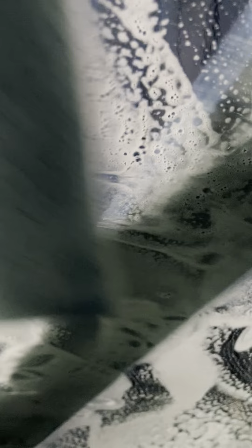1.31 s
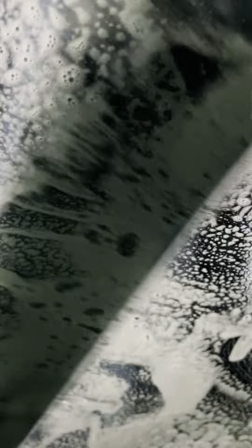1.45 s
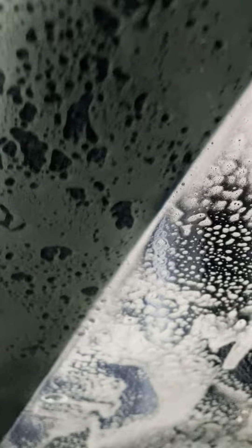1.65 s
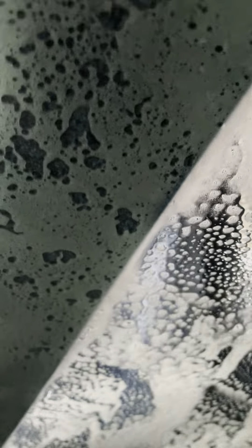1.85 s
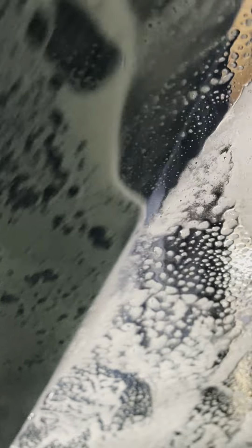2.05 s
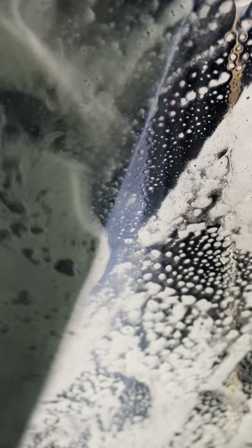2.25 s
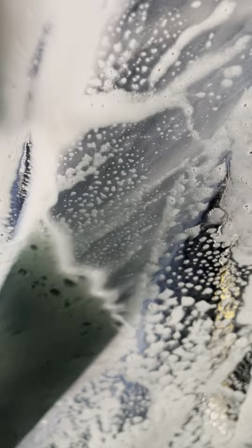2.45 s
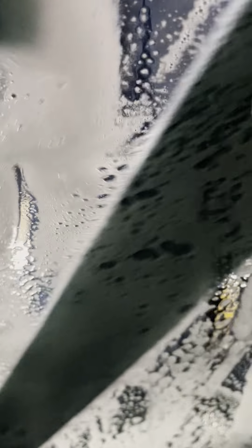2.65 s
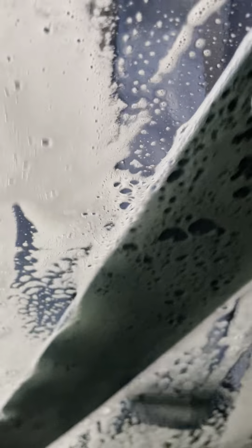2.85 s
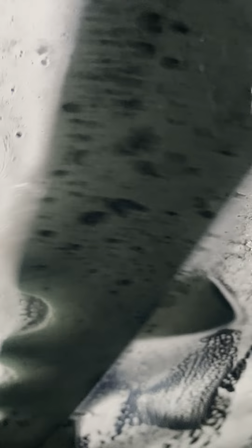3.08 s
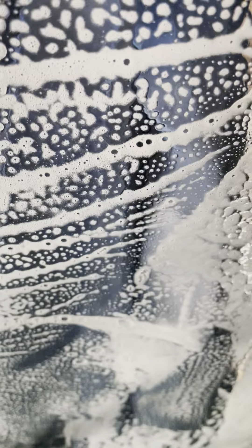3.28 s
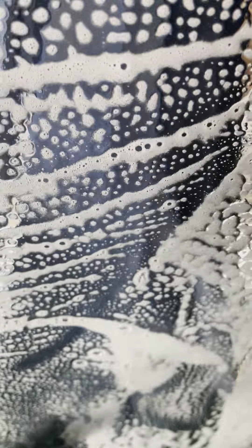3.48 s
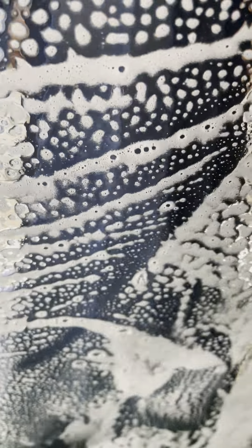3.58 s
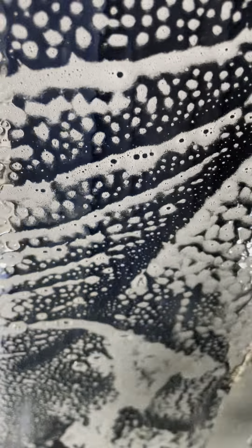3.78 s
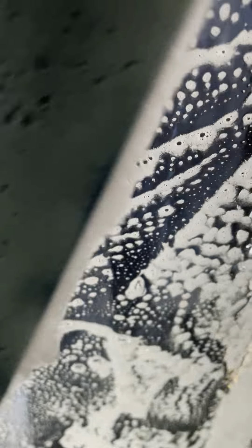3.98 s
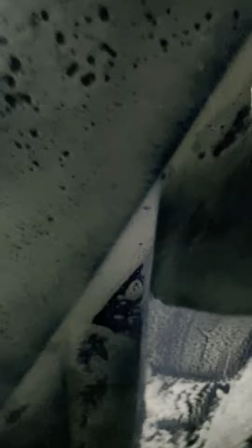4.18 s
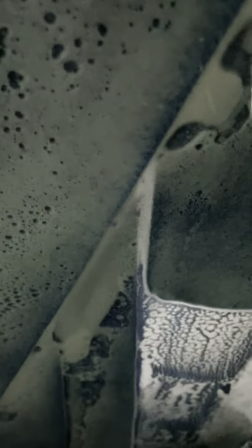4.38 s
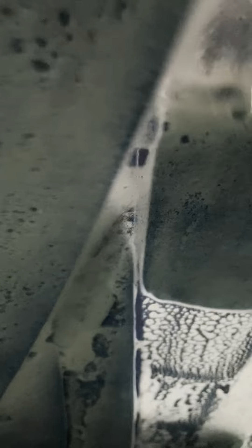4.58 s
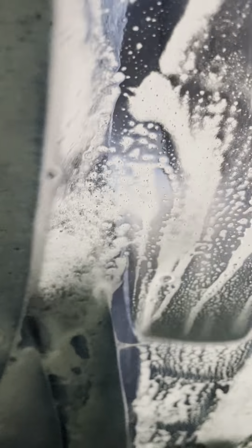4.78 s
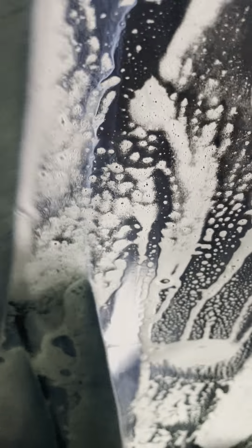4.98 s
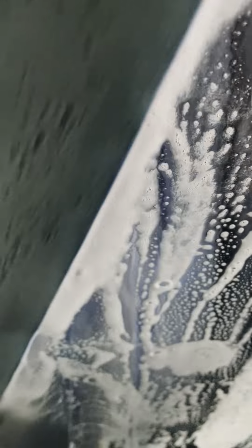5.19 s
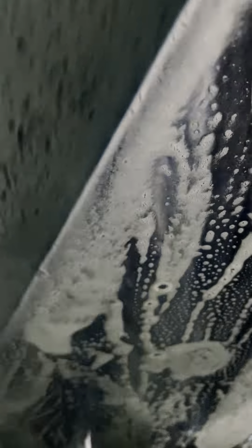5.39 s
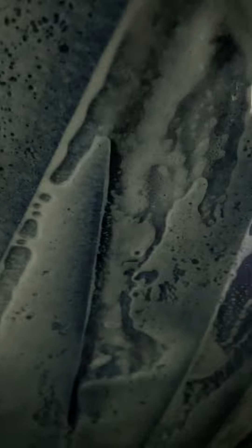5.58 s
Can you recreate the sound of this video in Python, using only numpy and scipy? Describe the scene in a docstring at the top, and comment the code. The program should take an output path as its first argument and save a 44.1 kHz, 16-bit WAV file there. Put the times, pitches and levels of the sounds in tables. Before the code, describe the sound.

Inside a car in a tunnel wash, a phone in the cabin picks up close, muffled stereo sound. From the start wet cloth drags over the body with a low, fluctuating rumble and faint dull pattering, while water spray hisses softly outside. A weak thump comes at 0.15 s, then a tight group of thuds and wet slaps at 0.5-0.6 s. Blows roll on from 1.0 to 1.5 s, and a dense splashy flurry hits the glass at 1.7-1.9 s. Single thumps follow at 2.35 and around 2.7 s, then a strong double cluster at 3.0-3.2 s. It eases to rubbing and light slaps until the hardest, deep booming blow near 4.2 s and a sharp slap at 4.4 s. After a sparser stretch with small hits near 5.0 and 5.2 s, a last cluster lands at 5.4-5.6 s. Panel booms die quickly; slaps leave short foamy, spattering tails.

```python
"""Inside a car in a tunnel wash, heard by a phone with two ports in the cabin.
From the start wet cloth drags over the body, rumbling and pattering (coloured noise, faint random taps),
and water spray hisses outside (brighter noise). From 0.15 s heavy blows thump the panels, which boom
(decaying sines); from 0.5 s wet strips slap the glass (noise bursts through resonances, a falling crack).
The hardest blow lands near 4.2 s; blows and slaps go on almost to the end at 5.6 s."""
import sys
import numpy as np
from scipy import signal
from scipy.fft import rfft, irfft
from scipy.io import wavfile
from scipy.ndimage import uniform_filter1d

SR = 44100
rng = np.random.default_rng(int(sys.argv[2]) if len(sys.argv) > 2 else 0)


def put_to_file(sound):
    """Save the sound as 16-bit audio at rate SR, in the file named by the first command-line argument."""
    columns = np.atleast_2d(sound).T  # one column per channel
    safe = np.clip(columns, -1, 1)
    whole_steps = np.round(safe * 32767)
    wavfile.write(sys.argv[1], SR, whole_steps.astype(np.int16))


N = 248283
HZ = np.maximum(np.fft.rfftfreq(N, 1 / SR), 1)  # frequency of each spectrum bin


def undb(db):
    """Decibels to amplitude."""
    return 10 ** (np.asarray(db) / 20)


def over_hz(table):
    """A (f/Hz, value) table on all frequencies, straight on a log axis."""
    hz, value = np.transpose(table)
    return np.interp(np.log(HZ), np.log(hz), value)


def over_time(table):
    """A (t/s, level/dB) table on all samples, in straight lines."""
    return np.interp(np.arange(N) / SR, *np.transpose(table))


def unit(x):
    """Scale to an RMS of 1."""
    return x / np.sqrt(np.mean(x ** 2))


def peak(x):
    """Scale to a peak of 1."""
    return x / np.abs(x).max()


def fade(t, t60):
    """Exponential decay that falls 60 dB in t60 seconds."""
    return np.exp(-np.log(1000) * t / t60)


def walk(rate):
    """Random levels held 1 / rate s and smoothed twice; spread near 1."""
    k = int(SR / rate)
    held = np.repeat(rng.standard_normal(N // k + 1), k)
    return 1.9 * uniform_filter1d(uniform_filter1d(held, k), k)[:N]


def flickering(colour, shared_db, own_db, rate):
    """Noise of a given colour in bands 2/3 octave apart that swell together and flicker alone."""
    white = rfft(rng.standard_normal(N)) * undb(over_hz(colour))
    out = 0
    for octave in np.arange(4, 14.6, 2 / 3):  # band centre, log2 of Hz
        window = np.cos(np.clip((np.log2(HZ) - octave) * 1.5, -1, 1) * np.pi / 2) ** 2
        out = out + irfft(white * window, N) * undb(shared_db + own_db * walk(rate))
    return unit(out)


def resonate(x, hz, width):
    """Two-pole resonance, gain 1 at the centre; width in Hz."""
    return signal.lfilter(*signal.iirpeak(hz, hz / width, SR), x)


def add(track, s, x):
    """Lay a sound into the track from s seconds on."""
    i = max(int(s * SR), 0)
    track[i:i + len(x)] += x[:N - i]


def drag_level():
    """How strongly the cloth drags along the car, in dB."""
    # course of the cloth drag: (t/s, level/dB)
    drag_course = [(0.0, -29.5), (0.64, -28), (0.92, -32), (1.22, -23.5), (1.54, -30.5), (1.93, -24.5),
                   (2.05, -31.5), (2.29, -32.5), (2.52, -28.5), (3.25, -29), (3.36, -30.5), (3.54, -29.5),
                   (4.36, -26), (4.56, -25), (4.77, -33), (5.03, -32.5), (5.14, -26.5), (5.63, -29)]
    return over_time(drag_course)


def cloth_drag(swell_db):
    """Cloth rubbing along the body: low coloured noise whose bands swell and flicker."""
    # colour of the dragging cloth: (f/Hz, relative level/dB per Hz)
    drag_colour = [(15, -45), (25, -4.5), (65, 2), (141, -2.5), (175, -4), (219, -15), (345, -10.5),
                   (454, -23), (600, -23.5), (1000, -43), (2000, -44), (4000, -77.5)]
    return undb(drag_level()) * flickering(drag_colour, swell_db, 2.8, 22.006)


def water_spray(swell_db):
    """Spray outside the cabin: hissing coloured noise with a slight flicker."""
    # colour of the spray: (f/Hz, relative level/dB per Hz)
    spray_colour = [(700, 7.5), (1100, 1.5), (1800, -3), (2400, 1), (3500, 1.5), (4300, -4), (5500, -8),
                    (8000, -23.5), (11000, -23.5), (13000, -35), (16000, -25.5)]
    # course of the spray: (t/s, level/dB)
    spray_course = [(0, -42.5), (.4, -44.5), (1., -42.5), (1.75, -47), (2.45, -42), (2.8, -45), (3.3, -44),
                    (4.15, -44.5), (5., -46.5), (5.63, -49.5)]
    return undb(over_time(spray_course)) * flickering(spray_colour, swell_db, 0.91, 19)


def patter(times, sizes):
    """Faint, dull taps of cloth fringes at random, swelling with the drag."""
    out = np.zeros(N)
    for s, (size, place) in zip(times, sizes):
        tap_db = 9 * size - 25
        pane_hz = 260 * 2 ** (0.65 * place)
        add(out, s, slap(tap_db, -13.0, pane_hz, 2400, -7.0))
    return undb(drag_level() + 10) * out


def thumps():
    """Each blow is a soft push that booms the panel it lands on and rings the body modes near its pitch."""
    # heavy blows on the panels: (t/s, peak level/dB before the bass cut, panel region f/Hz)
    blows = [(0.145, -27.5, 122), (0.534, -13.5, 94), (0.562, -12.5, 106.7), (0.615, -16.5, 129),
             (0.993, -22, 140), (1.009, -12, 144), (1.103, -16, 164), (1.157, -15.5, 125),
             (1.243, -17, 115.5), (1.32, -14.5, 130.5), (1.352, -16.5, 59.4), (1.442, -15, 119.6),
             (1.733, -12, 64.8), (1.807, -17, 80), (1.82, -13, 98.4), (1.824, -16.5, 298),
             (1.841, -16.5, 82.4), (1.864, -15.5, 171.4), (1.906, -21.5, 147), (2.258, -19.5, 150),
             (2.349, -9, 128), (2.51, -14.5, 109.4), (2.644, -19, 183), (2.695, -12, 125.6),
             (2.729, -12, 110), (2.748, -11, 119.4), (2.886, -19, 96), (3.072, -11, 149),
             (3.085, -13.5, 90.5), (3.172, -7.5, 207), (3.188, -7.5, 81.6), (3.204, -13, 206),
             (3.291, -16.5, 68), (3.696, -21.5, 85), (3.743, -18.5, 84.6), (4.011, -18, 97.6),
             (4.101, -20, 79.5), (4.158, -17.5, 123), (4.193, -4.5, 108.5), (4.222, -18, 85.6),
             (4.326, -18, 152), (4.412, -11, 248), (4.416, -9, 79), (4.621, -20.5, 78), (4.69, -19.5, 76.2),
             (5.024, -17, 74), (5.455, -16.5, 155), (5.478, -17, 318), (5.483, -9, 84.4), (5.51, -13, 84.3),
             (5.573, -17.5, 77)]
    # ringing modes of the body: (nominal f/Hz, t60/s, level/dB when struck at its own pitch)
    body_modes = [(51.3, 0.43, -4), (59.4, 0.16, -8.5), (86.7, 0.27, 0), (125.9, 0.13, 0), (154.4, 0.13, 1),
                  (186.4, 0.14, -6.5), (257, 0.06, 4.5), (324, 0.097, -3.5), (460, 0.055, -38)]
    panel_db, panel_cycles = 2, 11.4  # the struck panel's own boom; cycles to fall 60 dB
    push_s = 0.0042  # time constant: a strip lands progressively
    out, t = np.zeros(N), np.arange(int(.4 * SR)) / SR
    chance = rng.uniform(-1, 1, (len(blows), len(body_modes)))
    for (s, db, place_hz), row in zip(blows, chance):
        ring = undb(panel_db) * np.sin(2 * np.pi * place_hz * t) * fade(t, panel_cycles / place_hz)
        for (hz, t60, mode_db), u in zip(body_modes, row):
            near_db = -12. * abs(np.log2(hz / place_hz))  # 12 dB less per octave away
            # each blow shifts the mode's level and pitch a little
            tone = np.sin(2 * np.pi * hz * (1 + 0.022 * u) * t)
            ring = ring + undb(mode_db + near_db + 5.1 * u) * tone * fade(t, t60)
        ring = ring * (1 - np.exp(-t / push_s)) ** 2
        add(out, s - .002, undb(db) * peak(ring))
    out = out * np.minimum(np.arange(N)[::-1] / 200, 1)  # eases out, no click at the end
    # panels radiate no deep bass
    return signal.sosfilt(signal.butter(2, 42, "high", fs=SR, output="sos"), out)


def slap(db, splash_db, hz, splash_hz, foam_db):
    """A falling crack, then the pane rings with a later, deeper knock; water splashes and spatters."""
    crack_db, knock_db = -10, -1.5  # against the pane
    spatter_db, drops_per_s = -4.5, 990  # flung drops; level against the splash
    rise_s, rise_ref_db, rise_db_per_doubling = 0.0015, -13.5, 11
    sweep_start, sweep_end, sweep_s = 1.662, 0.584, 0.00493  # multiples of the pane colour; s
    snap_s, wash_s, wash_db = .022, .09, -12  # t60, t60, wash against the snap
    t = np.arange(int(.2 * SR)) / SR
    noise = rng.standard_normal((4, len(t)))

    # fainter contacts brush in more slowly
    rise = 1 - np.exp(-t / (rise_s * 2 ** ((rise_ref_db - db) / rise_db_per_doubling)))
    foam = rise * undb(foam_db) * fade(t, 0.077)
    contact = rise * fade(t, 0.012)

    # bending waves in the glass: highs arrive first
    sweep_hz = hz * (sweep_end + (sweep_start - sweep_end) * np.exp(-t / sweep_s))
    sweep = np.sin(2 * np.pi * np.cumsum(sweep_hz) / SR)
    crack = rise * fade(t, 0.052) * sweep * np.sign(noise[0, 0])  # random polarity

    pane = resonate(resonate(noise[1] * (contact + foam), hz, 0.3 * hz), hz, 0.9 * hz)
    late_push = (1 - np.exp(-t / 0.0084)) * (fade(t, 0.061) + foam)
    knock = resonate(noise[1] * late_push, 0.45 * hz, 0.14 * hz)
    knock = resonate(knock, 0.774 * hz, 0.27 * hz)

    landing = rng.random(len(t)) < drops_per_s / SR
    drops = uniform_filter1d(noise[0] ** 2 * landing, size=30) * 30 + .25  # over a steady floor
    spatter = noise[2] * drops * rise * (fade(t, 0.11) + foam)
    spatter = resonate(resonate(spatter, 1900, 2400), 2400, 3000)

    # a snap, then a weaker wash
    splash = noise[3] * np.sqrt(rise) * (fade(t, snap_s) + undb(wash_db) * fade(t, wash_s))
    splash = resonate(resonate(splash, splash_hz, 900), splash_hz, 3300)
    water = peak(splash) + undb(spatter_db) * peak(spatter)

    burst = peak(pane) + undb(crack_db) * peak(crack) + undb(knock_db) * peak(knock)
    burst = burst + undb(splash_db) * water
    # glass muffles the top
    return undb(db) * signal.sosfilt(signal.butter(3, 5200, fs=SR, output="sos"), burst)


def slaps():
    """Strips landing flat on glass; the squeezed foam's tail grows on wet slaps and shrinks on hard ones."""
    # (t/s, pane level/dB, splash level/dB against the pane, pane colour f/Hz, splash colour f/Hz)
    landings = [(0.515,-30.5,1.5,847,1800),(0.545,-32.5,-0.5,765,2600),(0.562,-34,-6,790,1500),(0.614,-40,-20,450,1920),(0.858,-32.5,-17,593,3700),(0.982,-25.5,-19,460,3040),(1.007,-26,-2,604,2630),(1.107,-24,-29,505,1770),(1.17,-33,-24,946,1770),(1.2,-37,-19,450,2000),(1.245,-23,-18,607,2130),(1.256,-26,-26,440,1500),(1.321,-30,-17,560,2840),(1.442,-25,-38,417,1770),(1.484,-29,-5.5,473,2830),(1.721,-32,-11,1034,1690),(1.788,-25,-6,603,3040),(1.793,-25,-6,894,2220),(1.8,-16,0,885,1730),(1.81,-27.5,-12,710,2000),(1.823,-17.5,-20,604,1900),(1.83,-25,-15,624,1500),(1.843,-29,-8,896,1710),(1.859,-23,-15,520,2480),(1.87,-31,-16,620,1510),(1.885,-26,-16,530,2130),(2.347,-29.5,0.5,608,2540),(2.648,-20,-11,880,2600),(2.736,-29,-3.5,720,2190),(2.752,-37.5,-5,690,2000),(3.021,-20,-12.5,553,2270),(3.048,-25,0,783,2030),(3.063,-30,1.5,910,2800),(3.073,-23,-6.5,487,2400),(3.145,-35.5,-4,900,1500),(3.17,-14.5,-13,692,2080),(3.179,-29,-2,910,3000),(3.189,-21,-3,563,1750),(3.195,-33,-1,800,3900),(3.204,-15.5,-14.5,379,2500),(3.4,-43,6,600,2400),(3.699,-34.5,3.5,663,2580),(3.808,-35,-3,573,2200),(3.874,-30,-5,530,2300),(3.975,-34.5,-18,742,2000),(3.999,-29.5,-5,623,2600),(4.125,-35,0,1254,2180),(4.156,-22.5,-7,760,2360),(4.187,-25,5,814,2300),(4.204,-30.5,1,1120,1900),(4.215,-26.5,-9,633,1750),(4.231,-29,-20,573,1600),(4.323,-24.5,-9,460,2200),(4.409,-10.5,-18.5,645,2280),(4.524,-30.5,-15,1120,2030),(5.045,-25.5,-26,616,1970),(5.21,-27.5,-7.5,617,2320),(5.368,-30,-18,683,1500),(5.38,-31.5,-15,913,1500),(5.416,-33.5,-11,1180,1600),(5.448,-24,-14,400,1940),(5.476,-18,-11.5,575,3700),(5.508,-19,-2,608,2390),(5.567,-39.5,-1.5,883,2800),(5.575,-31,-6,865,2800)]
    out = np.zeros(N)
    for s, db, splash_db, hz, splash_hz in landings:
        foam_db = -13 + 0.54 * splash_db - 0.12 * db
        add(out, s, slap(db, splash_db, hz, splash_hz, foam_db))
    return out


def two_ports(first, second):
    """Two unlike arrivals reach both ports, shared by likeness, lag and shading at each frequency."""
    # phase by which the left port leads: (f/Hz, lead/radians)
    port_lead = [(0, 0), (520, -.09), (860, .07), (1350, .45), (1750, .2), (2050, .43), (2750, 1.87),
                 (3450, 2.67), (4000, 1.45), (4500, 2.3), (5000, 6.0), (6700, 8.5), (7600, 9.4),
                 (11100, 12.6), (14200, 15.7), (16000, 17.5)]
    # how alike the ports hear: (f/Hz, likeness/0-1)
    port_likeness = [(100, .9999), (340, .99), (700, .92), (1050, .75), (1750, .75), (2250, .5),
                     (3000, .64), (3800, .33), (4700, .15), (5400, .77), (7000, .9), (14000, .88)]
    # left port against right: (f/Hz, level/dB)
    port_balance = [(60, -.1), (110, -.1), (170, -.5), (280, -1.7), (470, -2.3), (780, -2), (1300, -1),
                    (2180, .5), (3640, .4), (6080, .1)]
    like = np.clip(over_hz(port_likeness), 0, 1)
    common = rfft(first) * np.sqrt((1 + like) / 2)
    apart = rfft(second) * np.sqrt((1 - like) / 2)
    # each port takes half of the level and phase difference
    half_lead = np.exp(.5j * np.interp(HZ, *np.transpose(port_lead)))
    tilt = undb(over_hz(port_balance) / 2) * half_lead
    return np.array([irfft((common + apart) * tilt, N), irfft((common - apart) / tilt, N)])


def scene():
    """The cabin sound in two arrivals: same booms, timings and swells, separate noise."""
    tap_times, tap_sizes = rng.uniform(0, N / SR, 90), rng.random((90, 2))
    drag_swell, spray_swell = .8 * walk(14), 0.23 * walk(12)  # dB
    boom = thumps()

    def arrival():
        """One arrival of all the layers."""
        cloth = cloth_drag(drag_swell) + patter(tap_times, tap_sizes)
        return cloth + water_spray(spray_swell) + boom + slaps()

    return two_ports(arrival(), arrival())


def record(dry):
    """The phone drops the deepest bass and cuts the top."""
    dry = signal.sosfilt(signal.butter(2, 25, "high", fs=SR, output="sos"), dry)
    return signal.sosfilt(signal.ellip(12, .5, 50, 15750, fs=SR, output="sos"), dry)


dry = scene()
out = record(dry)
put_to_file(out)
```